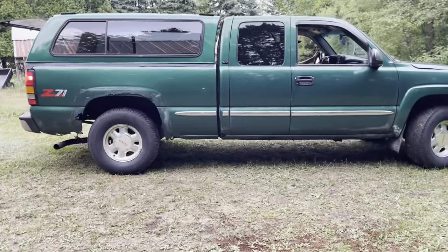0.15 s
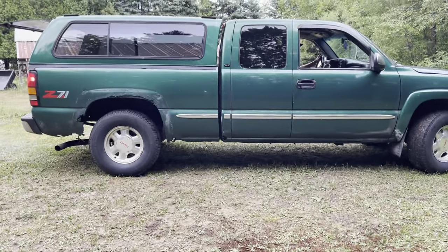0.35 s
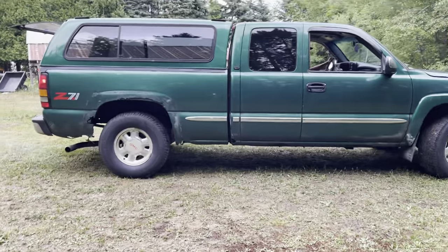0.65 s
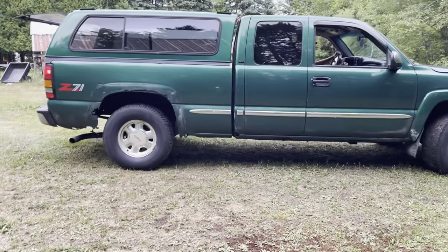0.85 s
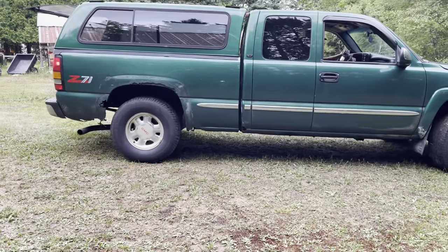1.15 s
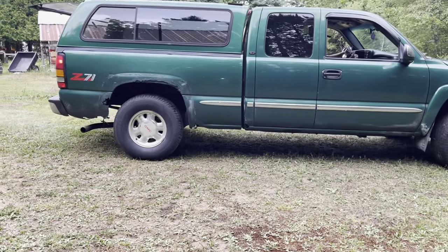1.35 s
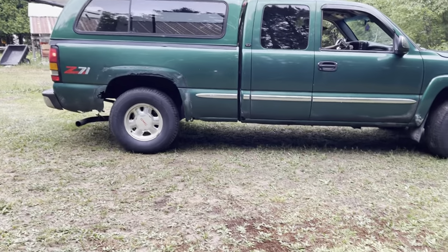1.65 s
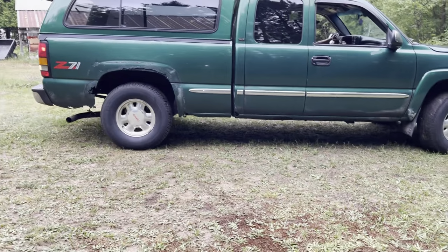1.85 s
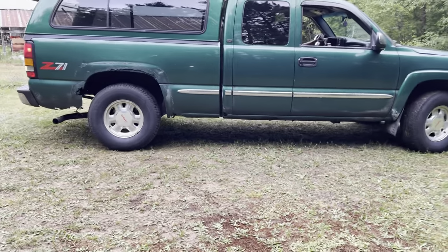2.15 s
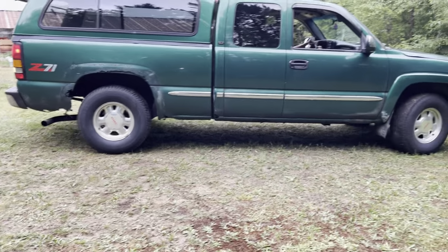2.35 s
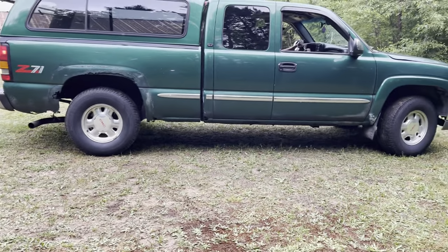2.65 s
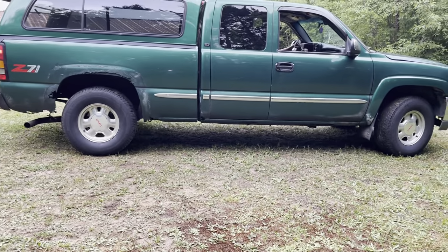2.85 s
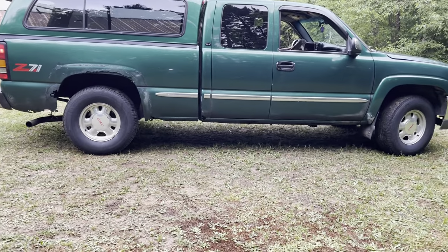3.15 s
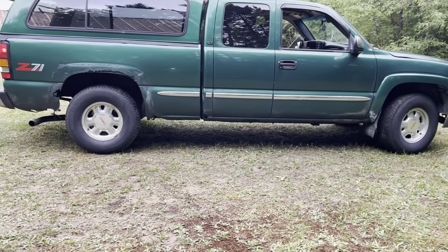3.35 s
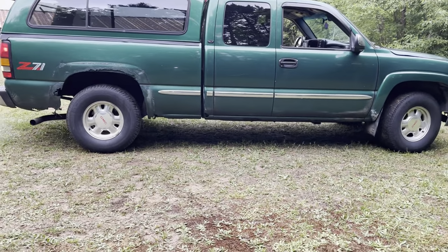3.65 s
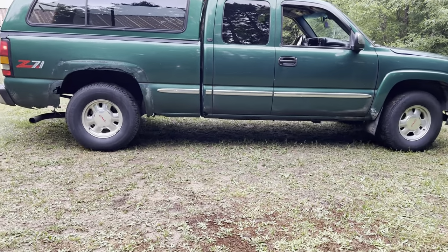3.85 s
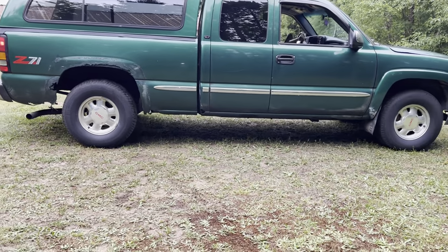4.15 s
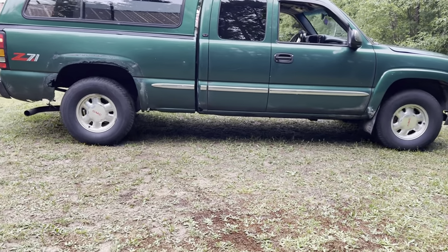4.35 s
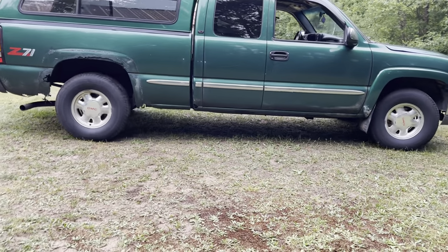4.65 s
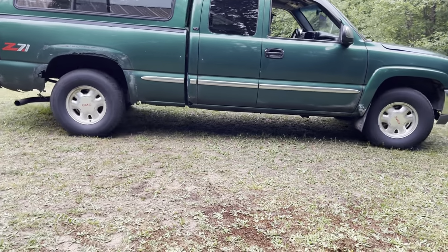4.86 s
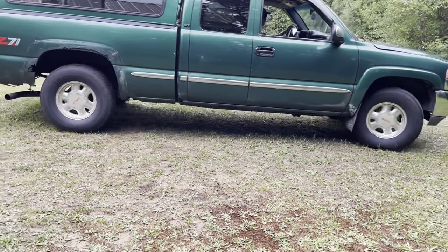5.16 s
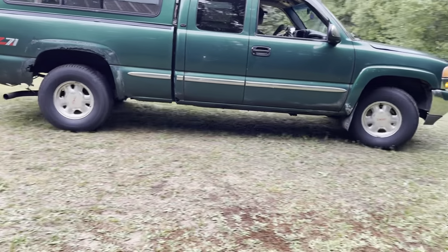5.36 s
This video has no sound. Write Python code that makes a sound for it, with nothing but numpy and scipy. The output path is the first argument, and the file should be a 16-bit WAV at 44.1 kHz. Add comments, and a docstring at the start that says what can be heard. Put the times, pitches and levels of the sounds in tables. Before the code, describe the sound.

Uneven deep exhaust burble with an early chassis clunk and steering hiss, dipping low, then swelling into a fuller, steadier engine drone.

```python
"""Pickup creeping round a grassy yard

A V8 lopes at idle, sags almost to a stall, then pulls up to 1000 rpm: firing pulses and gas ring the exhaust.
Fan and belts rush under the bonnet as throbbing noise, pumps whine as wavering tones, the steering hisses.
Noise bursts with ringing modes make the chassis clunk and clack; faint noise-band whistles glide far off.
Exhaust and engine bay grow louder with engine speed, and as each turns towards the two microphone ports."""
import sys
import numpy as np
from scipy import signal
from scipy.fft import rfft, irfft, next_fast_len
from scipy.io import wavfile
from scipy.ndimage import uniform_filter1d

SR = 44100
rng = np.random.default_rng(int(sys.argv[2]) if len(sys.argv) > 2 else 0)


def waveform_to_disk(signal):
    """Save audio, clipped to [-1, 1], as 16-bit WAV at the path in sys.argv[1]."""
    frames = np.transpose(np.atleast_2d(signal))
    scaled = np.clip(frames, -1, 1) * 32767
    samples = np.round(scaled).astype(np.int16)
    wavfile.write(sys.argv[1], SR, samples)


N = 242109
TIME = np.arange(N) / SR
SIZE = next_fast_len(N + 16384)  # padded, so that ringing does not wrap round
FREQS = np.fft.rfftfreq(SIZE, 1 / SR)

# engine speed: t/s, firings per second
ENGINE_SPEED = [(0.0, 39.36), (0.343, 39.02), (0.843, 40.31), (1.263, 36.76), (1.673, 36.58), (1.973, 42.2),
                (2.213, 44.15), (2.543, 34.44), (2.813, 30.16), (3.123, 29.88), (3.513, 46.85),
                (3.713, 50.85), (4.013, 51.05), (4.323, 60.45), (4.693, 65.96), (5.193, 67.26),
                (5.49, 63.89)]
# cylinders in firing order; the uneven strengths make the lope: strength/dB, lateness/firing intervals
CYLINDERS = [(-0.5, -0.04), (-0.3, 0.04), (3.4, -0.01), (-3.6, -0.02), (-1.8, 0.07), (1.8, -0.05),
             (-1.9, 0.01), (3.4, 0)]
# how near the turning truck brings its bonnet and its tailpipe: t/s, nearness 0-1
BONNET_NEAR = [(2.9, 0.4), (3.8, 1)]
PIPE_NEAR = [(3.0, 0), (3.451, 0.77), (4.1, 0.98), (4.65, 1), (5.2, 0.07), (5.49, 0.65)]
# loudness of the exhaust boom: level at idle/dB, gain per doubling of speed/dB, gain when near/dB
BOOM_LEVEL = (-32.5, 12.6, 2.97)


def amp(db):
    """Decibels to gain."""
    return 10 ** (np.asarray(db) / 20)


def unit(x):
    """Scales to rms 1."""
    return x / np.sqrt(np.mean(x ** 2) + 1e-20)


def curve(rows, column=1):
    """One column of a time table at every sample."""
    rows = np.asarray(rows)
    return np.interp(TIME, rows[:, 0], rows[:, column])


def spectrum(points):
    """A frequency table on every bin, interpolated along log frequency."""
    hz, value = np.transpose(points)
    return np.interp(np.log(FREQS + 1), np.log(hz + 1), value)


def shaped(x, gain):
    """Filters by a gain on every bin."""
    return irfft(rfft(x, SIZE) * gain, SIZE)[..., :N]


def ringing(points):
    """Minimum-phase response with the given spectrum: it rings only after a pulse."""
    log_gain = np.log(amp(spectrum(points)))
    cepstrum = irfft(log_gain, SIZE)
    # folding the cepstrum onto positive time makes the response causal
    cepstrum[1:SIZE // 2] *= 2
    cepstrum[SIZE // 2 + 1:] = 0
    return np.exp(rfft(cepstrum))


def steadied(x, lo_hz, hi_hz, size=11000):
    """Holds the slow level of one band at 1, so that a level curve can set it."""
    band = shaped(x, (FREQS > lo_hz) & (FREQS < hi_hz))
    power = np.atleast_2d(band ** 2).mean(0)
    slow_power = uniform_filter1d(uniform_filter1d(power, size), size // 2)
    return x / np.sqrt(slow_power + 1e-20)


def noise():
    """Two unrelated white noises."""
    return rng.standard_normal((2, N))


def resonant_noise(hz, width_hz):
    """Noise in one steep resonance, at half gain half a width off its centre."""
    return unit(shaped(noise(), 1 / (1 + (2 * (FREQS - hz) / width_hz) ** 2)))


def wander(rate_hz):
    """Slow random drift of rms 1."""
    return unit(shaped(noise()[0], 1 / (1 + (FREQS / rate_hz) ** 4)))


def whine(hz, waver_hz, drift_hz=9):
    """A clean tone whose pitch wavers."""
    pitch = hz + waver_hz * wander(drift_hz)
    return unit(np.sin(2 * np.pi * np.cumsum(pitch) / SR))


def spread(pair):
    """Two unrelated signals become what the ports share and what they do not."""
    # likeness of the sound at the two ports: f/Hz, likeness 0-1
    port_likeness = [(60, .99), (130, .98), (280, .96), (600, .84), (1300, .7), (2800, .62), (5000, .52),
                     (8000, .85), (13000, .8)]
    like = np.clip(spectrum(port_likeness), 0, 1)
    mid, side = shaped(pair, np.sqrt([(1 + like) / 2, (1 - like) / 2]))
    return np.array([mid + side, mid - side])


def loudness(law, nearness):
    """Gain of one part of the truck, from engine speed and how near that part is."""
    idle_db, speed_db, near_db = law
    idle_firings_per_s = 40
    doublings = np.log2(curve(ENGINE_SPEED) / idle_firings_per_s)
    return amp(idle_db + speed_db * doublings + near_db * curve(nearness))


def chirps(width_hz=130):
    """Each far whistle is a narrow band of noise carried along a glide, swelling and fading."""
    # whistles: start t/s, length/s, from f/Hz, to f/Hz, level at the height/dB
    whistles = [(.46, .06, 2900, 3900, -63), (.88, .42, 2520, 2600, -69), (1.33, .04, 4200, 3800, -64),
                (1.36, .045, 3600, 2400, -63), (1.4, .1, 2480, 2180, -64.5), (1.5, .1, 2150, 2850, -63.5),
                (1.99, .08, 3100, 4300, -68), (2.63, .08, 2200, 4300, -70)]
    blur = wander(width_hz) + 1j * wander(width_hz)
    out = np.zeros(N)
    for start_s, length_s, from_hz, to_hz, db in whistles:
        on = (TIME > start_s) & (TIME < start_s + length_s)
        part = (TIME[on] - start_s) / length_s
        pitch = from_hz * (to_hz / from_hz) ** part
        carrier = np.exp(2j * np.pi * np.cumsum(pitch) / SR)
        swell = np.sqrt(np.sin(np.pi * part))
        out[on] += amp(db) * swell * (carrier * blur[on]).real
    return out


def knocks(blows, colour, rise_s=0.0007, grain_db=2):
    """Each blow sets loose parts rattling briefly, coloured by the resonances of the thing struck."""
    grain = amp(grain_db * noise()[0])  # makes the rattle uneven
    rattle = spread(unit(noise() * grain))
    octaves = np.log2(np.maximum(FREQS, 200) / 1000)
    body = ringing(colour)
    out = np.zeros((2, N))
    for start_s, db, bright_db, decay_s in blows:
        age = np.maximum(TIME - start_s, 0)
        blow = (1 - np.exp(-age / rise_s)) * np.exp(-age / decay_s)
        response = body * amp(bright_db * octaves)
        response = response / np.sqrt(np.mean(abs(response) ** 2))
        out += amp(db) * shaped(blow * rattle, response)
    return out


def rings(blows, modes):
    """The struck metal rings on after each blow as decaying sines, joining the knocks together."""
    start_s, blow_db = np.transpose(blows)[:2]
    age = TIME[:SR // 2]
    ring = sum(amp(db - 60 * age / t60) * np.sin(2 * np.pi * hz * age) for hz, db, t60 in modes)
    hits = np.bincount((start_s * SR).astype(int), amp(blow_db), N)
    return signal.oaconvolve(hits, ring)[:N]


def chassis_clunks():
    """Dull chassis clunks: short rattles with long low modes."""
    # blows: t/s, level/dB, brightness/dB per octave, decay time constant/s
    clunk_blows = [(.238, -36.5, 5, 0.012), (.245, -25, -3.5, 0.012), (.251, -30, -18, 0.009),
                   (.264, -38.5, -0.5, 0.042), (.303, -41, 5, 0.0047), (.3095, -34, -2, 0.011),
                   (.345, -35.5, -6, 0.12), (.472, -44.5, 1, 0.012), (1.589, -43.5, 2.5, 0.026),
                   (1.699, -44, 0.5, 0.017), (2.400, -31, -7.5, 0.028)]
    # colour of the struck chassis: f/Hz, level/dB
    clunk_colour = [(30, -19), (70, 17), (130, -3), (200, 1.5), (400, 9.5), (620, 0.5), (850, -1),
                    (1250, 6.5), (1480, 1.5), (1620, 2.5), (1900, -10), (2140, -0.5), (2500, -14),
                    (3000, -15), (4900, -18), (7000, -25), (15000, -56)]
    # what rings on: f/Hz, level re the blow/dB, t60/s
    clunk_modes = [(374, -25, 0.75), (1016, -37, 0.3), (1210, -31, 0.095), (1346, -31, 0.33),
                   (1566, -34.5, 0.11), (2073, -25.5, 0.36), (2998, -26.5, 0.073)]
    return knocks(clunk_blows, clunk_colour) + rings(clunk_blows, clunk_modes)


def metal_clacks():
    """Sharp metal clacks: brief bright rattles with short modes."""
    # blows: t/s, level/dB, brightness/dB per octave, decay time constant/s
    clack_blows = [(2.368, -50, 8, 0.016), (3.267, -40, -2.5, 0.018), (3.2695, -35, 10, 0.0062),
                   (3.282, -37.5, -4, 0.0092)]
    # colour of the struck metal: f/Hz, level/dB
    clack_colour = [(300, -27), (780, 2), (1050, 0), (1800, 9), (2150, 5), (2600, 0), (3000, 8.5),
                    (3500, 5.5), (3900, -1.5), (4450, -2), (4900, 2), (6200, -11.5), (7000, -6.5),
                    (9000, -16.5), (15000, -27)]
    # what rings on: f/Hz, level re the blow/dB, t60/s
    clack_modes = [(1100, -8.5, .13), (1556, -14, 0.078), (2150, -9, .12), (2920, -16, .12),
                   (4910, -16, 0.1), (6850, -21, .07)]
    return knocks(clack_blows, clack_colour) + rings(clack_blows, clack_modes)


def pump_whines(swell_hz=4):
    """Thin whines of pumps, wavering in pitch and swelling at random."""
    # whines: f/Hz, level/dB, pitch waver/Hz, depth of swelling 0-1
    pump_tones = [(383, -60.5, 3, .3), (616, -66, 8, .6)]
    return sum(amp(db) * whine(hz, waver_hz) * unit(1 + depth * wander(swell_hz))
               for hz, db, waver_hz, depth in pump_tones)


def steering_hiss(flutter_db=1.8, flutter_hz=14):
    """Turning the wheel forces fluid through the valve: a fluttering hiss that sings as the flow peaks."""
    # turns of the wheel: t at the height/s, half-length/s, drive level/dB
    wheel_turns = [(1.25, 0.45, -62), (2.312, 0.065, -63), (2.632, .03, -60), (2.78, 0.01, -61),
                   (3.994, 0.28, -53)]
    # resonances of the valve: f/Hz, width/Hz, level/dB
    valve_resonances = [(2200, 280, -1), (1650, 260, -3), (1350, 450, -3)]
    # narrow noisy tones that come up faster than the hiss: f/Hz, width/Hz, level at full flow/dB
    valve_tones = [(2195, 80, -4), (12140, 110, -21), (12360, 130, -19)]
    hiss = sum(amp(db) * resonant_noise(hz, width) for hz, width, db in valve_resonances)
    sings = sum(amp(db) * resonant_noise(hz, width) for hz, width, db in valve_tones)
    flow = sum(amp(db) / (1 + ((TIME - s) / half_s) ** 4) for s, half_s, db in wheel_turns)
    sound = spread(flow * (hiss + flow / flow.max() * sings))
    return sound * amp(flutter_db * wander(flutter_hz))


def intake_hoot(waver_hz=16, drift_hz=45, rough=.7, rough_hz=30):
    """Air drawn through the intake holds one rough tone, strongest as the engine pulls."""
    # the intake's tone: t/s, f/Hz, level/dB
    intake_tone = [(1.7, 1000, -75), (2.3, 970, -60), (2.9, 990, -63), (3.4, 1005, -68), (4.15, 1015, -56),
                   (4.45, 1028, -52), (4.62, 1018, -51), (4.74, 1020, -43.5), (4.86, 1015, -53),
                   (4.96, 1012, -50), (5.2, 992, -52), (5.37, 1010, -48), (5.49, 1005, -55)]
    tone = whine(curve(intake_tone), waver_hz, drift_hz)
    return amp(curve(intake_tone, column=2)) * unit(tone * (1 + rough * wander(rough_hz)))


def cyclic(count, fresh, size=4096):
    """Turbulence that partly repeats with every engine cycle, so it holds close-set lines."""
    pattern = noise()[:, :size]
    place = count / len(CYLINDERS) % 1 * size
    repeated = np.array([np.interp(place, np.arange(size), p) for p in pattern])
    fresh = np.clip(fresh, 0, 1)
    return np.sqrt(1 - fresh) * unit(repeated) + np.sqrt(fresh) * noise()


def puffs(count, between, length):
    """A gate that opens as each interval begins and dies away before the next, over a constant floor."""
    return between + np.exp(-(count % 1) / length)


def engine_bay(count, tick_db=-16):
    """Fan and belt rush with valve ticks, throbbing with the firings and changing colour as the bonnet turns."""
    # colour turned away from the microphone, and facing it: f/Hz, level/dB
    away_colour = [(100, 19.5), (450, 1.5), (640, 2.5), (820, -4.5), (1150, -5), (1600, -8.5), (2500, -8),
                   (4000, -11), (5000, -11), (7000, -16), (10000, -23.5), (13000, -24.5)]
    facing_colour = [(200, -2), (600, -2.5), (900, -1.5), (1020, -0.5), (1120, -1.5), (1550, -3),
                     (1920, -6.5), (2150, -6), (2350, -8.5), (2520, -22), (2720, -12.5), (2920, -10),
                     (4000, -16.5), (6000, -19), (8200, -29), (10000, -26), (13000, -35)]
    # level at idle/dB, gain per doubling of speed/dB, gain when near/dB
    rush_level = (-51.5, 8.76, 2.5)
    fizz_level = (-62, 7.9, 8.3)
    air = unit(cyclic(count, fresh=0.79) * puffs(count, between=4.3, length=0.65))
    # two ticks to a firing interval
    ticks = unit(cyclic(count, fresh=0.93) * puffs(2 * count, between=0, length=0.08))
    drive = spread(air + amp(tick_db) * ticks)
    facing = np.clip(curve(BONNET_NEAR), 0, 1)
    sound = (1 - facing) * shaped(drive, ringing(away_colour))
    sound = sound + facing * shaped(drive, ringing(facing_colour))
    # low rush and high fizz grow with speed at their own rates
    split_hz = 1820
    rush = shaped(sound, 1 / (1 + (FREQS / split_hz) ** 12))
    fizz = sound - rush
    return (loudness(rush_level, BONNET_NEAR) * steadied(rush, 350, 3800)
            + loudness(fizz_level, BONNET_NEAR) * steadied(fizz, 1780, 11400))


def underbody(x, echo=0.3, drift_s=0.000566, count=5):
    """Reflections between ground and body comb the sound, and shift as the truck turns."""
    out = x.copy()
    delays_s = rng.uniform(0.002067, .016, count)
    slides = rng.uniform(-1.176, 1, count)
    for delay_s, slide in zip(delays_s, slides):
        late = delay_s + slide * drift_s * TIME / TIME[-1]
        reflection = np.array([np.interp(TIME - late, TIME, port, left=0) for port in x])
        out += echo / np.sqrt(count) * reflection
    return out / np.sqrt(1 + echo ** 2)


def firings(count, load, idle_rough=0.16, load_rough=0.08, jitter=.018, evening=.35):
    """One pulse a firing; cylinders differ in strength and delay, load evens them, and no two burns are alike."""
    number = np.arange(1, int(count[-1]) + 1)
    strength_db, late = np.array(CYLINDERS)[number % len(CYLINDERS)].T
    burn, slip = noise()[:, number]
    pull = np.interp(number, count, load)
    lope = 1 - evening * pull ** 2
    moment = number + lope * late + jitter * slip  # in firing intervals
    at = np.interp(moment, count, np.arange(N)).astype(int)
    rough = idle_rough + (load_rough - idle_rough) * pull
    size = amp(lope * strength_db) + rough * burn
    return np.bincount(at, size, N)


def drones(count, load, waver=0.35, waver_hz=4):
    """A few wavering tones tied to the engine cycle stand out as the load peaks."""
    # tones: multiple of the engine cycle, level re the boom at full load/dB
    drone_tones = [(5, -19), (7, -19), (15, -17), (17, -21), (21.6, -12.5), (23.2, -20), (35, -24),
                   (43, -20), (48, -25), (53.2, -22.5), (56, -26)]
    cycle = count / len(CYLINDERS)
    tones = 0
    for multiple, db in drone_tones:
        swell = 1 + waver * wander(waver_hz)
        phase = 2 * np.pi * multiple * cycle + waver * wander(waver_hz)
        tones = tones + amp(db) * swell * np.sin(phase)
    return loudness(BOOM_LEVEL, PIPE_NEAR) * load ** 5 * np.sqrt(2) * tones


def bark(count, pulses, load, idle_gas_db=4, load_gas_db=1.5):
    """Pulse fronts and gusts of gas ring the standing waves of the pipe; load firms and rebalances the lines."""
    # standing waves of the exhaust pipe: f/Hz, width/Hz, level at idle/dB, level under load/dB
    standing_waves = [(169.7, 16, -0.5, 6), (204.2, 18.6, 1, -4.5), (234, 38, 2.5, -3.5),
                      (252.4, 14.2, 5, 3), (281, 37, -0.5, -0.5), (327.4, 17.2, -5.5, 1),
                      (345.2, 11.7, 0.5, 0), (390.5, 34, -5.5, -3), (435.3, 43.6, -10, -4),
                      (496, 88, -11.5, -10), (605.7, 9.8, -7.5, -16), (800, 7.6, -38, -9.5)]
    # level at idle/dB, gain per doubling of speed/dB, gain when near/dB
    bark_level = (-46.5, 10.75, 4.4)
    gas = unit(spread(cyclic(count, fresh=0.48) * puffs(count, between=0.76, length=0.53)))
    fronts = np.sqrt(abs(pulses))  # the fronts differ less between cylinders than the pushes behind them
    gas_db = idle_gas_db + (load_gas_db - idle_gas_db) * load
    drive = unit(fronts) + amp(gas_db) * gas
    hz, width, idle_db, load_db = np.transpose(standing_waves)[:, :, None]
    signs = (-1) ** np.arange(len(standing_waves))[:, None]  # neighbouring modes alternate in sign
    modes = signs / (1 + 1j * (FREQS ** 2 - hz ** 2) / (width * FREQS + 1e-9))
    idling = shaped(drive, (amp(idle_db) * modes).sum(0))
    pulling = shaped(drive, (amp(load_db) * modes).sum(0))
    sound = idling + load ** 2 * (pulling - idling)
    return loudness(bark_level, PIPE_NEAR) * steadied(sound, 220, 410)


def boom(pulses, load, idle_gas_db=-8, load_gas_db=-18):
    """Firing pulses and the churning gas behind them ring the muffler; the gas blurs the upper partials."""
    # response of muffler and tailpipe: f/Hz, level/dB
    muffler = [(22, -34.5), (33, -8), (41, -8.5), (50, 0), (62, 2.5), (80, -2.5), (89, -2.5), (101, -11),
               (119, -3), (134, -7), (155, -18), (178, -14), (205, -26), (330, -28), (700, -76.5),
               (5000, -77.5)]
    # colour of the gas churning in the muffler: f/Hz, level/dB
    gas_colour = [(35, -3), (65, -3), (110, -2), (150, 4), (250, 2)]
    gas_db = idle_gas_db + (load_gas_db - idle_gas_db) * load
    gas = amp(gas_db) * shaped(spread(noise()), amp(spectrum(gas_colour)))
    muffled = shaped(gas + unit(pulses), ringing(muffler))
    return loudness(BOOM_LEVEL, PIPE_NEAR) * steadied(muffled, 30, 200)


def scene():
    """Engine speed and load drive the exhaust together; speed drives the engine bay too."""
    # engine load, under which the cylinders fire more evenly: t/s, load 0-1
    engine_load = [(0, 0), (2.4, 0.42), (3.15, 0), (3.6, 0), (4.4, 0.72), (5.49, 0.98)]
    first_firing = 0.147  # firing intervals the crank has already turned at the start
    count = first_firing + np.cumsum(curve(ENGINE_SPEED)) / SR
    load = np.clip(curve(engine_load), 0, 1)
    pulses = firings(count, load)
    background = chirps() + chassis_clunks() + metal_clacks()
    under_bonnet = pump_whines() + steering_hiss() + intake_hoot() + underbody(engine_bay(count))
    exhaust = drones(count, load) + bark(count, pulses, load) + boom(pulses, load)
    return background + under_bonnet + exhaust


def record(dry):
    """The two ports differ in phase and level; then the low cut and the band limit."""
    # between the ports: f/Hz, lead of the left/radians
    port_phase = [(60, 0), (300, -.08), (1300, -.75), (1700, -1.3), (2100, -.65), (4100, -.2), (5150, .8),
                  (6700, -1), (7700, -2.9), (8900, -3.5), (11000, -6.1), (13000, -7.7), (14500, -9.4)]
    # between the ports: f/Hz, left minus right/dB
    port_tilt = [(60, -1), (250, -1.1), (600, -.9), (1200, -1.8), (2100, .5), (4000, 3), (7500, .5),
                 (13000, 0)]
    low_cut_hz, edge_hz = 29, 13750
    # each port takes half of the difference
    half = np.exp(.5j * spectrum(port_phase)) * amp(spectrum(port_tilt) / 2)
    low_cut = 1 - 1 / (1 + (FREQS / low_cut_hz) ** 10)
    heard = shaped(dry, low_cut * np.array([half, 1 / half]))
    band_limit = signal.firwin(511, edge_hz, window=("kaiser", 9), fs=SR)
    return signal.oaconvolve(heard, band_limit[None], "same")


dry = scene()
out = record(dry)
waveform_to_disk(out)
```